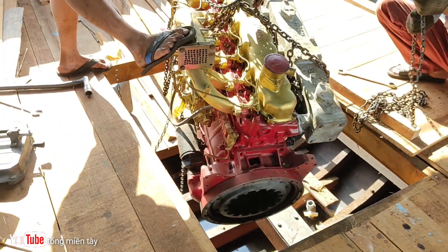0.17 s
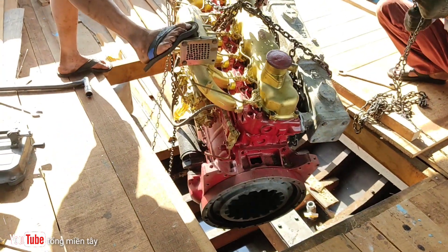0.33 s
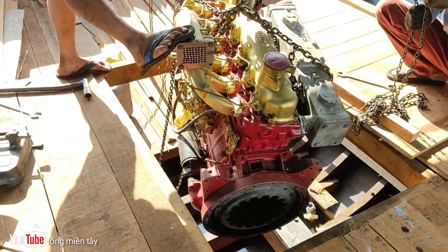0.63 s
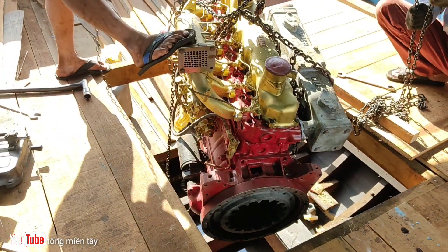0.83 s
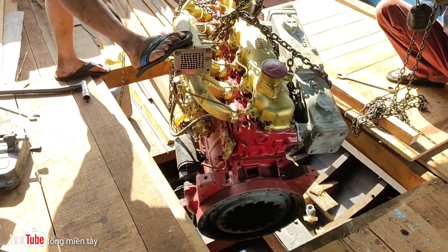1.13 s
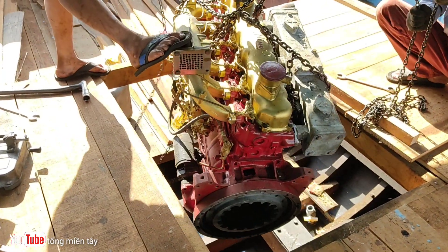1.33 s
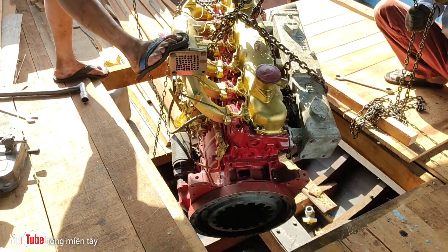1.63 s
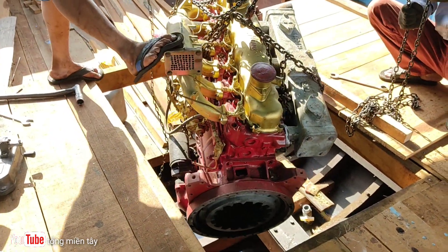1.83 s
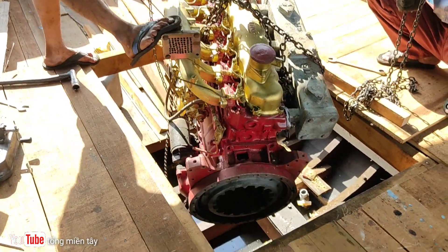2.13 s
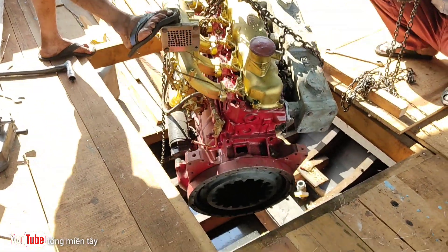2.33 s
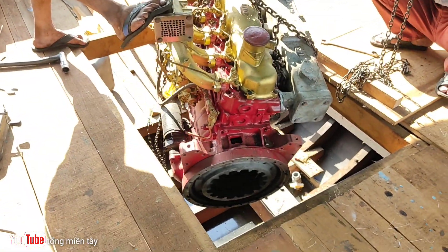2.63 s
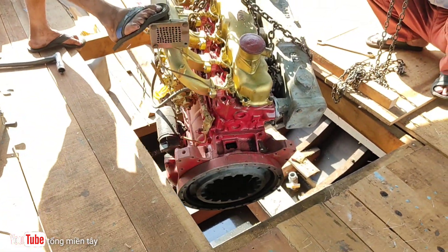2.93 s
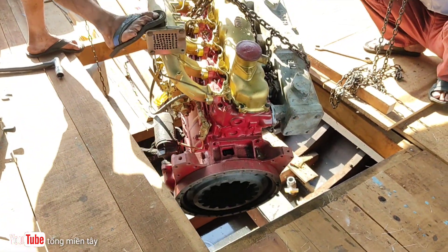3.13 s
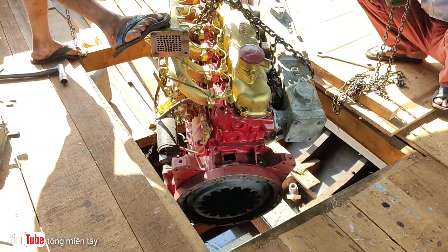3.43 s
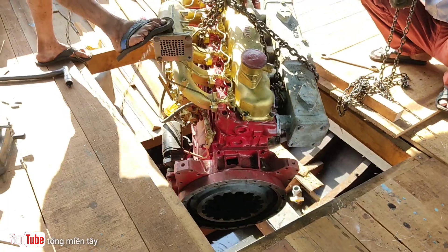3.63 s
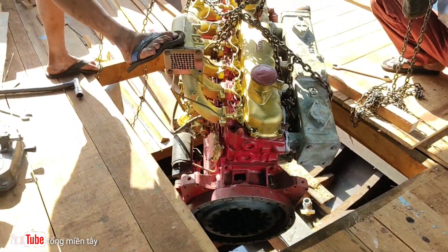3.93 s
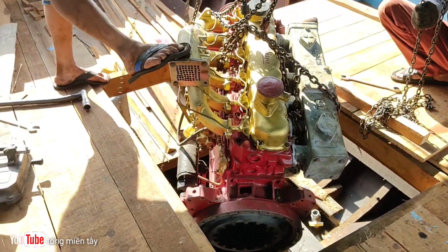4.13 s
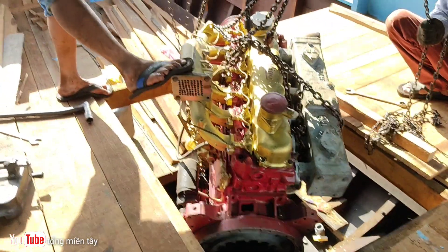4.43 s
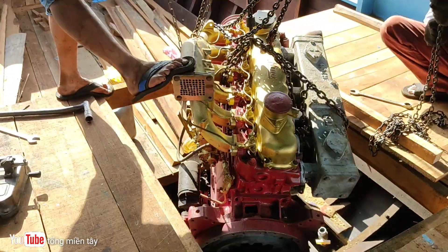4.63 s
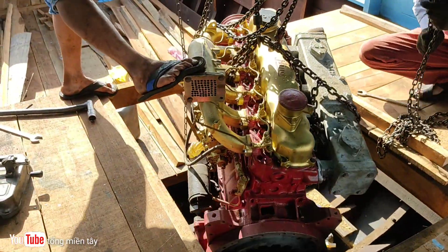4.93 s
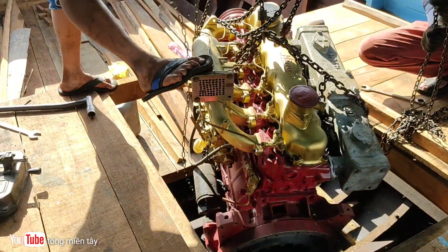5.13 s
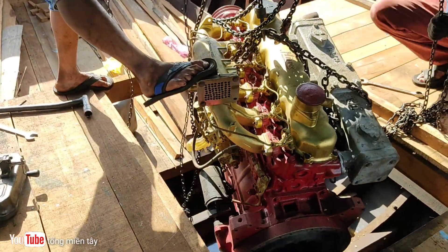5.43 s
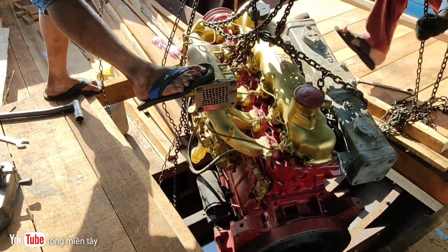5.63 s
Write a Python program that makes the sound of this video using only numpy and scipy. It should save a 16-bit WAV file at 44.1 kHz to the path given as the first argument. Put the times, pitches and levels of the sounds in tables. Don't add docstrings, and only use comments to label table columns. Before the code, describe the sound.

Hand-hauled hoist chains rattle in fast metallic bursts, with slaps, clanks and link pings between pulls, while a distant power tool whines down.

```python
import sys
import numpy as np
from scipy import signal
from scipy.io import wavfile
from scipy.ndimage import uniform_filter1d

SR = 44100
rng = np.random.default_rng(int(sys.argv[2]) if len(sys.argv) > 2 else 0)


def attenuation_scalar(level_db):
    decades = np.asarray(level_db, float) / 20
    return 10 ** decades


def bounce(signal):
    frames = np.transpose(np.atleast_2d(signal))
    limited = np.clip(frames, -1, 1)
    pcm = np.round(limited * 32767).astype(np.int16)
    wavfile.write(sys.argv[1], SR, pcm)


N = 255339
TIME = np.arange(N) / SR

# grip or start in s, let-go or end in s, links in dB, casing and frame in dB over links.
STROKES = [(-.1, 0.088, -16, -4.5, -7), (0.226, 0.328, -31.5, 12, -6), (0.586, 0.971, -14, -4, -6),
           (2.194, 2.367, -14.5, -6.5, -3), (2.768, 3.087, -14, -3, -7), (3.1, 3.169, -24.5, -12, 3),
           (3.542, 3.914, -13, -3.5, -7), (4.57, 4.64, -42, 14, 1), (4.701, 4.794, -44, 7.5, 14),
           (5.073, 5.092, -27.5, 5.5, 13.5), (5.087, 5.398, -14.5, -6, -9), (5.411, 5.527, -16.5, -3, -3),
           (5.533, 5.593, -16, -5, -22)]
# snatch over the steady haul in dB,
# time to settle in s, sag as the arm runs out of reach in dB/s, t60 after let-go in s.
START_DB = [8.5, -10, -17, -18]
SETTLE_S = [0.004, 0.051, 0.06, 0.075]
SAG_DB_PER_S = [10.5, 17.5, 33.5, 5]
DIE_T60_S = [0.13, 0.26, 0.052, 0.58]


def hauling():
    grip_rise_s, cover_over_casing_db = 0.0062, 2.5
    response = np.array([START_DB, SETTLE_S, SAG_DB_PER_S, DIE_T60_S])
    start_db, settle_s, sag_db_per_s, t60_s = response[:, :, None]
    force = np.zeros((4, N))
    for grip_s, let_go_s, db, casing_db, frame_db in STROKES:
        at = max(round(grip_s * SR), 0)
        age = TIME[at:at + SR] - grip_s
        held = np.minimum(age, let_go_s - grip_s)
        over_db = np.array([[0], [casing_db], [casing_db + cover_over_casing_db], [frame_db]])
        shape_db = start_db * np.exp(-age / settle_s) - sag_db_per_s * held
        shape_db = shape_db - 60 * (age - held) / t60_s
        force[:, at:at + SR] += np.clip(age / grip_rise_s, 0, 1) * attenuation_scalar(db + over_db + shape_db)
    return force * attenuation_scalar(0.86 * drift(14.4))


# start in s, peak in dB, t60 in s, left-right in dB.
SLAPS = [(.4254, -13.5, .19, 7.5), (.559, -23, 0.1, 17), (1.075, -11, .18, 8.5), (1.2195, -19, 0.087, 12),
         (1.232, -17.5, 0.093, 2.5), (1.6844, -28, .15, 7), (1.716, -9, 0.066, 1), (1.8114, -36, .17, 9),
         (2.0198, -27, 0.31, 14), (2.557, -13.5, 0.24, 8), (2.6036, -11, .082, -3),
         (2.71, -20.5, 0.044, 21), (2.7307, -8.5, 0.046, 7.5), (3.3912, -1, 0.041, 8),
         (3.4533, -8, 0.12, 6), (3.5045, -12, 0.11, -3), (4.2744, -26, 0.081, 4), (4.5476, -13, 0.16, -1),
         (4.9494, -29, 0.15, 16), (4.9955, -21.5, 0.047, 14)]
# start in s, peak in dB, t60 in s, left-right in dB.
BANGS = [(.208, -7.5, .068, 3), (1.1094, -24, 0.13, -2.5), (1.316, -14.5, 0.054, 14.5),
         (1.404, -34.5, 0.22, 13), (2.0444, -30, .24, 17), (2.1625, -25, 0.1, 9), (2.5084, -11, 0.1, 5),
         (3.4805, -15.5, 0.15, 6), (4.029, -31, 0.12, 18), (4.145, -27.5, 0.33, 16), (4.202, -6.5, 0.07, 5),
         (4.248, -6, 0.2, 4.5), (4.4573, -31.5, 1, 16), (4.5885, -21, 0.11, 4.5), (4.737, -16.5, 0.07, 5),
         (4.822, -24, 0.29, 4), (5.7572, -9, 0.085, 5)]


def slapping():
    rise_s = 0.0014
    links, casing = np.zeros((2, N)), np.zeros((2, N))
    for rows, casing_share_db in ((SLAPS, -35), (BANGS, -7)):
        for s, db, t60_s, pan_db in rows:
            at = round((s - .0015) * SR)
            age = TIME[:N - at][:SR // 2]
            decay = attenuation_scalar(db - 3.5 - 60 * age / max(t60_s, .02))
            swarm = (1 - np.exp(-age / rise_s)) * decay * leaning(pan_db - 5)
            links[:, at:at + SR // 2] += swarm
            casing[:, at:at + SR // 2] += attenuation_scalar(casing_share_db) * swarm
    return links, casing


# time in s, level in dB.
SWING = [(.15, -28.5), (.26, -42.5), (.58, -40), (1.0, -28.5), (1.14, -36.5), (1.27, -47), (1.51, -38),
         (1.7, -51), (2.06, -40), (2.42, -40), (2.57, -28.5), (2.77, -37), (3.23, -43), (3.96, -37.5),
         (4.29, -45), (4.44, -39), (4.92, -45), (5.72, -36)]


def jingling():
    jingle_db, = in_time(SWING)
    return attenuation_scalar(jingle_db + 2.56 * drift(5.7))


# frequency in Hz, level in dB per Hz.
LINKS = [(1880, -38), (3200, -9), (3440, -17.5), (4060, -13), (5130, -13.5), (6050, -10.5), (7380, -1),
         (8540, -1.5), (9500, -8.5), (10300, -45.5), (13200, -42.5), (14600, -59), (15600, -13)]


def link_modes(cycles, low_hz, high_hz, count):
    hz = np.linspace(low_hz, high_hz, count) + rng.uniform(-85, 44, count)
    return [(f, f / cycles, at_hz(LINKS, f) - 10 * np.log10(f / cycles)) for f in hz]


def chain(force):
    body = rattle(force, link_modes(81, 3307, 10217, count=30), 9000, 2.3, 0.28, .00007)
    body = signal.sosfilt(signal.cheby2(8, 40, 11200, fs=SR, output="sos"), body)
    top_modes = link_modes(32, 10200, 14700, count=10)
    return body + rattle(attenuation_scalar(-21.5) * force, top_modes, 8500, 2.7, 0.53, 0.000269)


# start in s, peak in dB.
PINGS = [(0.0403, -39), (0.1835, -29), (0.413, -21), (0.5841, -45), (0.9438, -38), (1.0455, -28),
         (1.2121, -13), (1.4815, -31), (1.6837, -24), (2.0177, -12), (2.2169, -26), (2.2927, -37),
         (2.3615, -50), (2.4992, -48), (2.6065, -13), (2.7402, -45), (2.9856, -26), (3.2939, -33),
         (3.389, -16), (3.5149, -20), (4.2018, -43), (4.4485, -28), (4.6029, -16), (4.8219, -36),
         (4.9856, -40), (5.0968, -46), (5.1961, -35), (5.4056, -44), (5.5154, -36), (5.691, -48)]
# frequency in Hz, width in Hz, level in dB.
PING = [(12700, 160, 10), (12620, 31, 5), (12850, 52, 18), (13200, 120, -16), (13200, 160, -31)]


def free_link(links):
    pings = dying([(s, attenuation_scalar(db - 10.5)) for s, db in PINGS], 0.2)
    shiver = after_strokes(db=-42.5, rise_s=0.028, t60_s=1.3)
    return rattle(shiver + attenuation_scalar(-33) * links + pings, PING, 3700, 3.4, 0.11, 0.000354)


# frequency in Hz, width in Hz, level in dB.
CASING = [(426, 150, -21.5), (527, 240, -2.5), (734, 230, -0.5), (881, 82, 8.5), (988, 43, 17),
          (1153, 102, 10.5), (1310, 71, 11.5), (1430, 290, -56)]
# frequency in Hz, width in Hz, level in dB.
COVER = [(1940, 260, -5), (2104, 200, -5), (2570, 250, 0), (2570, 2, 2), (2843, 100, -6), (3510, 32, -44),
         (3870, 400, -20)]


def shell(casing, cover, slaps):
    out = rattle(casing + 0.73 * slaps, CASING, 2500, 4.43, 0.49, 0.00016)
    return out + rattle(cover + 0.49 * slaps, COVER, 2500, 1.9, 0.078, 0.00035)


# frequency in Hz, width in Hz, level in dB.
FRAME = [(91, 6, -3), (136.5, 8.3, -3), (175, 20, -3), (244, 14, -15), (292, 31, -14)]


def frame_shake(force):
    shake = rattle(force, FRAME, 400, 1.17, 0.8, .00007)
    return signal.sosfilt(signal.butter(2, [70, 600], "band", fs=SR, output="sos"), shake)


# start in s, peak in dB.
KNOCKS = [
    (4.149, -13),
    (4.156, -18.5),
    (4.163, -18),
    (4.17, -17),
    (4.179, -20),
]
# frequency in Hz, level in dB, t60 in s.
PLANK = [(414, -10, 0.051), (545, -6, 0.081), (608, 11.5, 0.068), (660, -1, 0.048), (820, 14, 0.016),
         (930, -1, 0.021), (1070, 14.5, 0.012), (1310, 13.5, 0.01), (1640, -5, 0.024), (2110, 5, 0.031),
         (2500, -8, 0.037), (3030, -28, .025)]


def knocks():
    force = np.zeros((3, N))
    scuff = np.exp(-np.arange(400) / SR / 0.0042)
    scuff = scuff / np.sqrt(np.sum(scuff ** 2))
    for s, db in KNOCKS:
        at = round(s * SR)
        force[:, at:at + 400] += attenuation_scalar(db - 11.0) * rng.standard_normal((3, 400)) * scuff
    blows = to_ports(force[0], force[1:], 0.99, .0001) * leaning(1.4)
    return sum(attenuation_scalar(db) * ring(blows, hz, width_of(t60_s)) for hz, db, t60_s in PLANK)


# start in s, level in dB, frequency in Hz, t60 in s.
TAPS = [
    (3.161, -41, 2570, 0.55),
    (3.298, -47, 2500, .9),
    (3.392, -19, 2610, 0.049),
    (4.258, -12.5, 2545, 0.081),
    (4.258, -22, 2054, 0.058),
    (4.862, -13.5, 4900, 0.018),
    (5.09, -21, 1272, 0.22),
    (5.199, -21, 1324, 0.49),
    (5.401, -22, 1310, 0.5),
]


def taps():
    out = np.zeros(N)
    for s, db, hz, t60_s in TAPS:
        click = attenuation_scalar(db) * (np.arange(N) == round(s * SR))
        out += ring(click, hz, width_of(t60_s))
    return to_ports(out, 0, 0.93, .00007)


# frequency in Hz, left-right in dB.
TILT = [(60, 3.5), (92, 5), (140, -1), (210, 7.5), (330, 6), (500, 15), (770, 3), (1170, 5), (1790, -1.5),
        (2740, 0), (4190, -2.5), (6410, -6.5), (9810, 13.5), (15000, 0.5)]


def rattle(force, modes, per_s, spread_db, alike, lag_s):
    patch_db = 3.5
    sizes = attenuation_scalar(spread_db * np.minimum(rng.exponential(1, (3, N)), 5)) * rng.choice([-1, 1], (3, N))
    contacts = rms_one(sizes * (rng.random((3, N)) < per_s / SR))
    contacts = force * to_ports(contacts[0], contacts[1:], alike, lag_s)
    reached = rng.random((len(modes), N // 48 + 1)) < 1 / 3
    patches = np.repeat(rng.standard_normal((len(modes), N // 576 + 1)), 12, axis=1)
    reached = reached * attenuation_scalar(patch_db * patches[:, :reached.shape[1]] - 3.0)
    power = np.sum(attenuation_scalar(2 * np.array(modes)[:, 2]) * np.array(modes)[:, 1]) / 3
    out = 0
    for touch, (hz, width_hz, db) in zip(reached, modes):
        gain = attenuation_scalar(db) * width_hz * np.sqrt(4 * np.pi / SR / power)
        gain = gain * leaning(at_hz(np.add(TILT, [1, 0]), hz))
        out = out + gain * ring(contacts * np.repeat(touch, 48)[:N], hz, width_hz)
    return out


def echoes(x):
    age = np.arange(SR // 4) / SR
    tail = rng.standard_normal((2, len(age))) * attenuation_scalar(-60 * age / 0.24) * (age > .004)
    tail = attenuation_scalar(-5) * tail / np.sqrt(np.sum(tail ** 2, axis=1, keepdims=True))
    return signal.fftconvolve(x, tail, axes=1)[:, :N]


# time in s, tooth rate in Hz.
RUN_DOWN = [(0, 5080), (.55, 5040), (1.5, 5030), (1.62, 4970), (1.75, 4780), (1.9, 4520), (2.04, 4320),
            (2.2, 4010), (2.5, 3600)]
# time in s, level in dB.
TOOL = [(0, -38), (.3, -35), (.55, -32.5), (1.0, -38.5), (1.3, -30.5), (1.6, -30.5), (2.04, -28.5),
        (2.12, -38), (2.4, -59)]


def tool():
    teeth, overtone_db = 94, -20
    switch_off_s, hum_t60_s = 1.48, 0.72
    (mesh_hz,), (whine_db,) = in_time(RUN_DOWN), in_time(TOOL)
    hum_db = -41.5 - 60 * np.maximum(TIME - switch_off_s, 0) / hum_t60_s
    turn = 2 * np.pi * np.cumsum(mesh_hz) / SR / teeth
    loaded = np.clip((1.9 - TIME) / .5, .75, 1)
    whine = []
    for side_db in (1.0, -1.0):
        mesh = teeth * turn + loaded * (1.3 * drift(50) + .8 * drift(240))
        throb = (1 + .5 * np.cos(turn)) * attenuation_scalar(1.0 * drift(100))
        overtone = attenuation_scalar(overtone_db) * (loaded < .9) * np.sin(2 * mesh)
        whine.append(attenuation_scalar(side_db) * throb * (np.sin(mesh) + overtone))
    multiples_db = [0.5, -17, 0.0, 6, -0.5, -3.5]
    hum = sum(attenuation_scalar(db) * np.sin(k * turn + k * k) for k, db in enumerate(multiples_db, 1))
    return 1.47 * attenuation_scalar(whine_db) * np.array(whine) + attenuation_scalar(hum_db) * hum


# frequency in Hz, level in dB per Hz.
DECK = [(12, -36), (20, 0.5), (54, 0), (92, -5.5), (113, -5.5), (177, -3), (275, -10), (400, -24),
        (520, -13), (880, -120)]


def deck():
    level = attenuation_scalar(-35) + after_strokes(db=-30.5, rise_s=0.097, t60_s=1.6)
    return level * leaning(4.9) * banded_noise(DECK, 0.76, 0.62)


# frequency in Hz, level in dB per Hz.
YARD = [(190, -42), (330, -13), (475, -5), (1380, -11.5), (1480, -13.5), (2490, -12), (3820, -21),
        (4300, -17), (5590, -50), (9460, -120)]


def yard():
    return attenuation_scalar(-39.5) * banded_noise(YARD, 0.43, 4.06)


def wind():
    return attenuation_scalar(-34.5) * leaning(1.0) * to_ports(drift(1.0), np.array([drift(0.84), drift(3.3)]), 0.58, 0)


def banded_noise(spectrum, alike, patchy_db):
    low_hz, high_hz = spectrum[0][0], spectrum[-1][0]
    edges = low_hz * 2 ** np.arange(0, np.log2(high_hz / low_hz) + .3, .5)
    white = rng.standard_normal((2, 3, N))
    out = 0
    for k, (low, high) in enumerate(zip(edges, edges[1:])):
        bands = signal.sosfilt(signal.butter(2, [low, high], "band", fs=SR, output="sos"), white[k % 2])
        gain = attenuation_scalar(at_hz(spectrum, np.sqrt(low * high)) + patchy_db * drift(8.6))
        out = out + gain * to_ports(bands[0], bands[1:], alike, .00007)
    return rms_one(out)


def after_strokes(db, rise_s, t60_s):
    left = dying([(s, attenuation_scalar(db + stroke_db + 10)) for _, s, stroke_db, *_ in STROKES], t60_s)
    return uniform_filter1d(left, round(rise_s * SR))


def dying(events, t60_s):
    kicks = np.zeros(N)
    for s, gain in events:
        kicks[round(s * SR)] += gain
    return signal.lfilter([1], [1, -attenuation_scalar(-60 / t60_s / SR)], kicks + 1e-18)


def ring(clicks, hz, width_hz):
    r, w = np.exp(-np.pi * width_hz / SR), 2 * np.pi * min(hz, .45 * SR) / SR
    return signal.lfilter([0, np.sin(w)], [1, -2 * r * np.cos(w), r * r], clicks + 1e-18)


def width_of(t60_s):
    return np.log(1000) / np.pi / t60_s


def to_ports(shared, own, alike, lag_s):
    late = np.interp(TIME - lag_s, TIME, shared)
    alike = np.clip(alike, 0, 1)
    return np.sqrt(alike) * np.array([late, shared]) + np.sqrt(1 - alike) * own


def leaning(db):
    return attenuation_scalar(np.array([[.5], [-.5]]) * db)


def drift(rate_hz):
    r = np.exp(-80 * np.pi * rate_hz / SR)
    slow = signal.lfilter([1], [1, -2 * r, r * r], rng.standard_normal(N // 40 + 2002))[2000:]
    return np.interp(np.arange(N) / 40, np.arange(len(slow)), rms_one(slow))


def rms_one(x):
    return x / np.sqrt(np.mean(x ** 2) + 1e-20)


def in_time(rows):
    s, *columns = np.transpose(rows)
    return [np.interp(TIME, s, c) for c in columns]


def at_hz(points, hz):
    return np.interp(np.log(hz), np.log(np.array(points)[:, 0]), np.array(points)[:, 1])


def scene():
    links, casing, cover, frame = hauling()
    slap_links, slap_casing = slapping()
    near = chain(links + slap_links + jingling()) + free_link(links)
    dull = shell(casing, cover, slap_casing) + knocks()
    near += signal.sosfilt(signal.butter(4, 6000, fs=SR, output="sos"), dull) + taps()
    far = tool() + deck() + yard()
    return near + echoes(near) + frame_shake(frame) + far + wind()


def top_cut(x):
    return signal.sosfilt(signal.butter(12, 15780, fs=SR, output="sos"), x)


def record(dry):
    rounded = .95 * np.tanh(dry / .95)
    cut = signal.sosfilt(signal.cheby2(10, 50, 16300, fs=SR, output="sos"), rounded)
    return top_cut(cut)


dry = scene()
out = record(dry)
bounce(out)
```